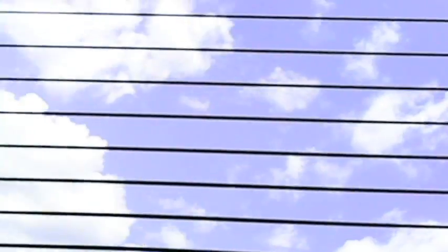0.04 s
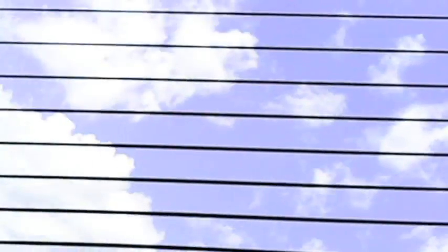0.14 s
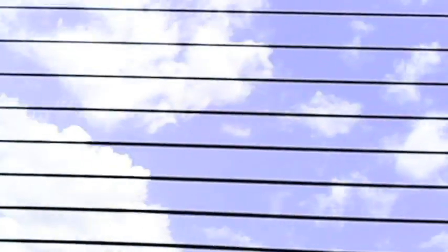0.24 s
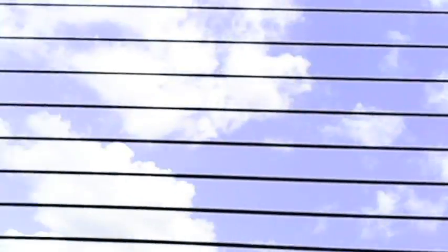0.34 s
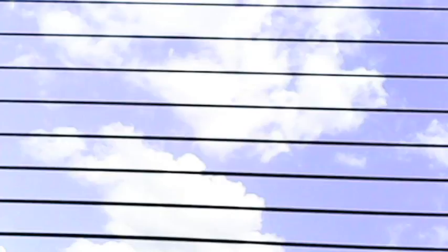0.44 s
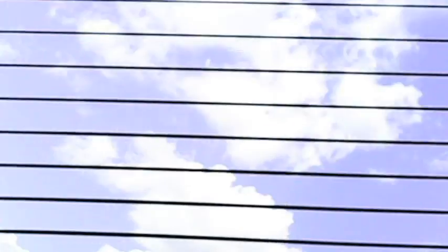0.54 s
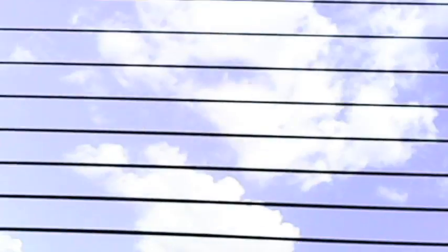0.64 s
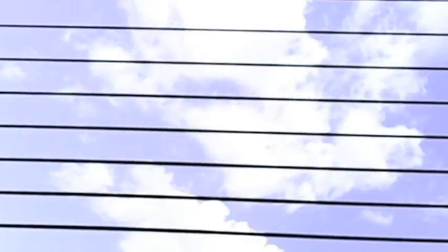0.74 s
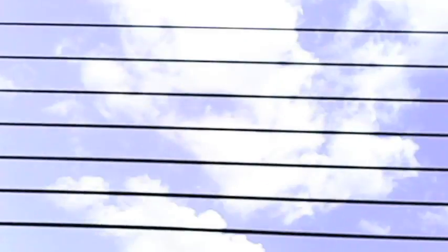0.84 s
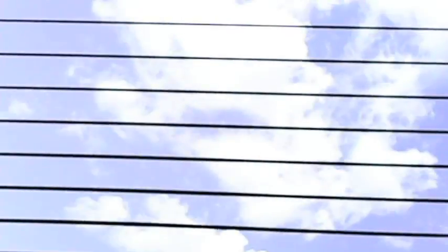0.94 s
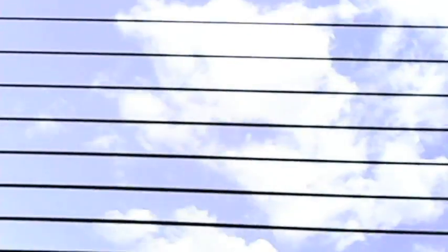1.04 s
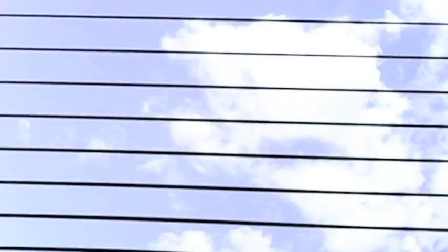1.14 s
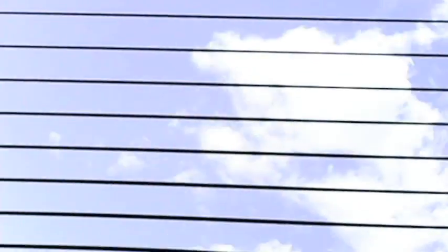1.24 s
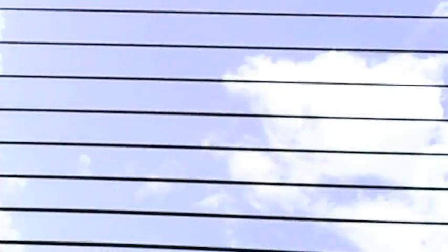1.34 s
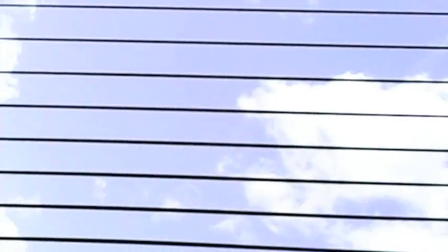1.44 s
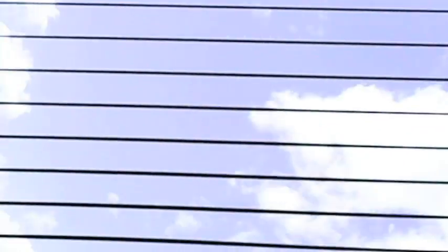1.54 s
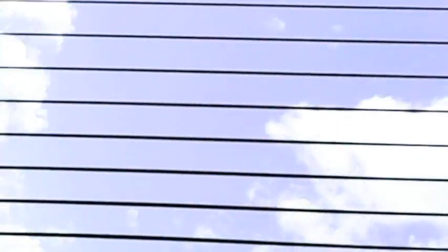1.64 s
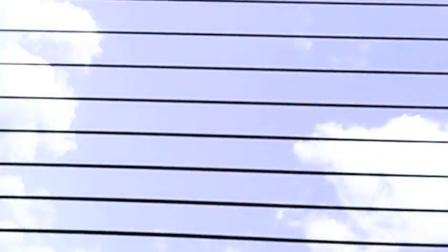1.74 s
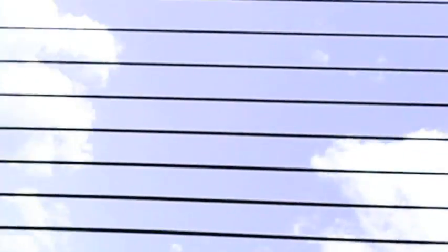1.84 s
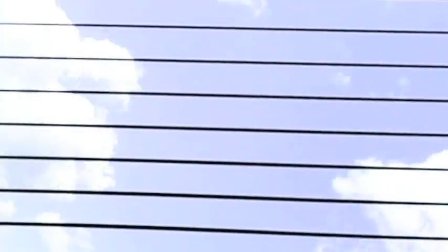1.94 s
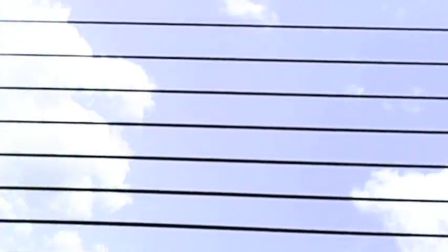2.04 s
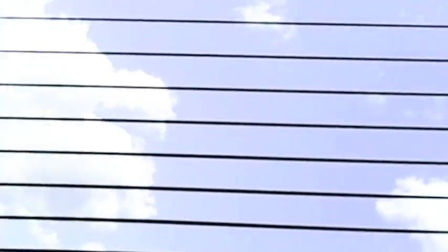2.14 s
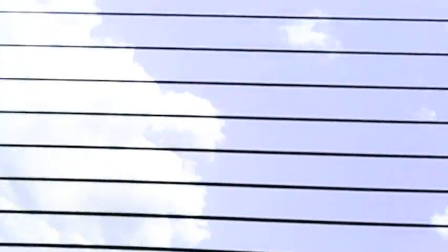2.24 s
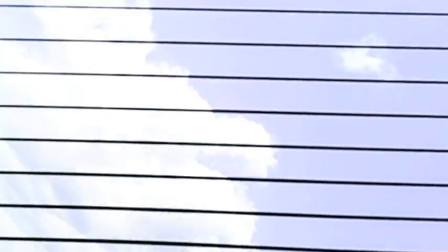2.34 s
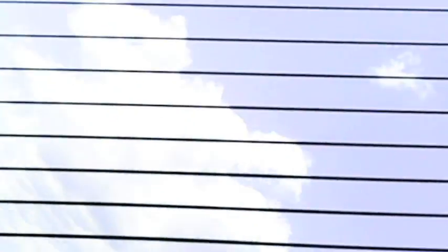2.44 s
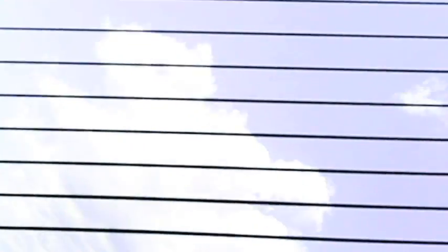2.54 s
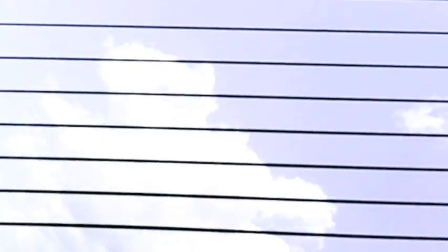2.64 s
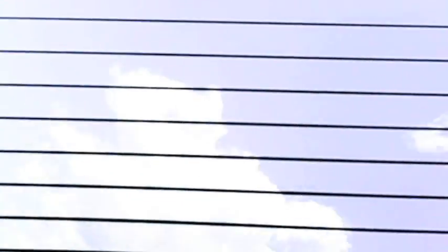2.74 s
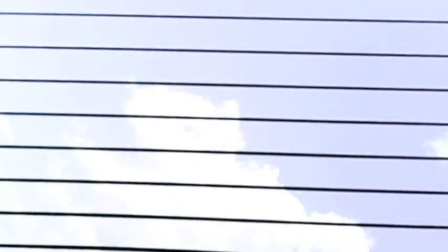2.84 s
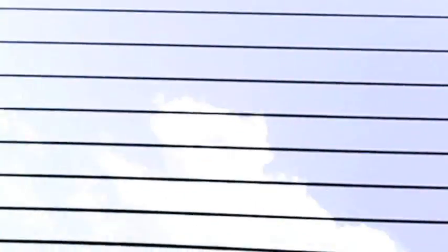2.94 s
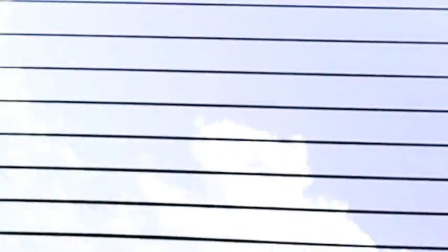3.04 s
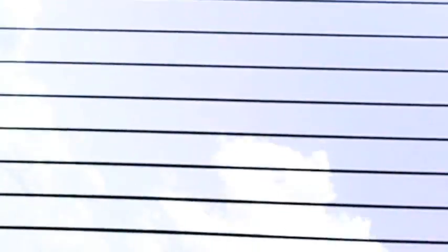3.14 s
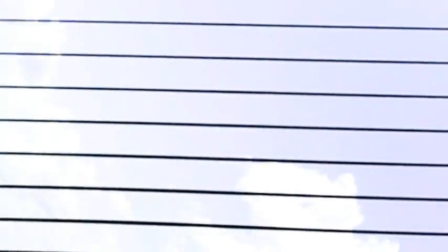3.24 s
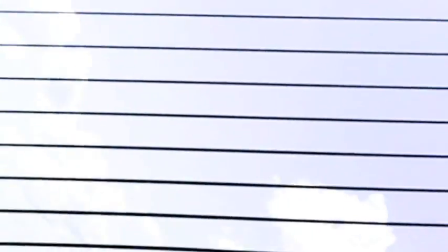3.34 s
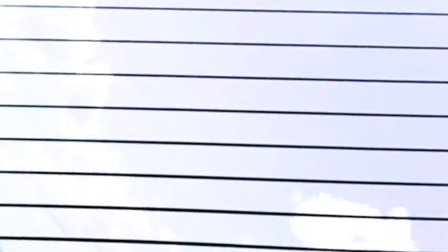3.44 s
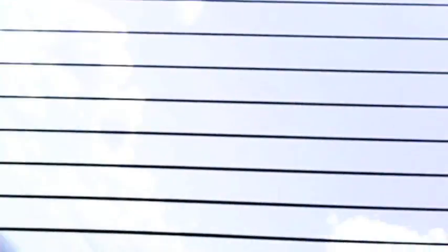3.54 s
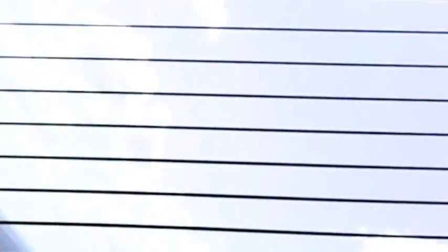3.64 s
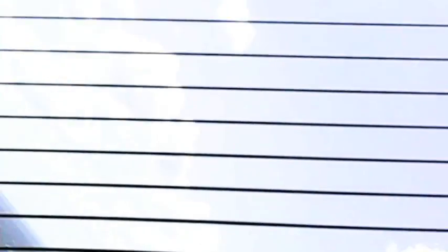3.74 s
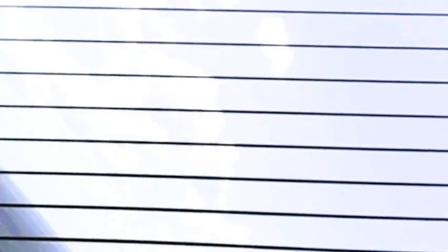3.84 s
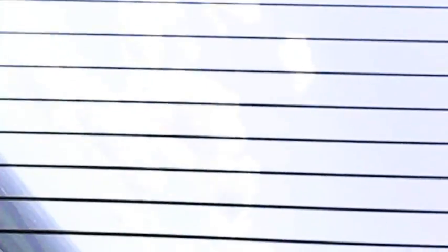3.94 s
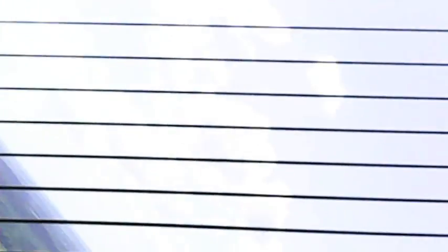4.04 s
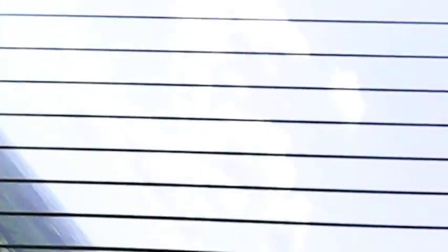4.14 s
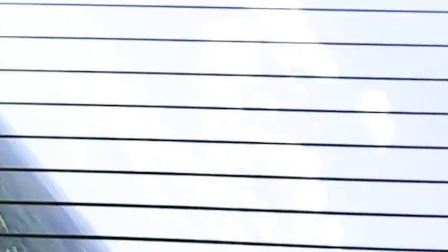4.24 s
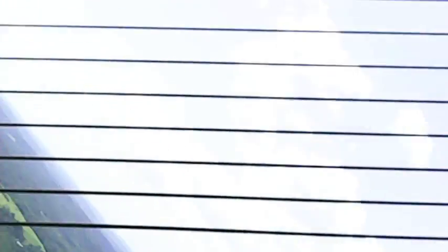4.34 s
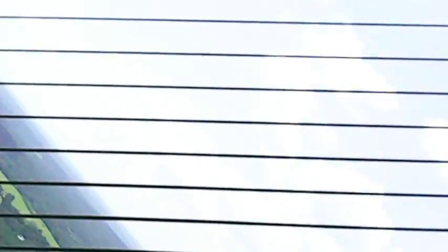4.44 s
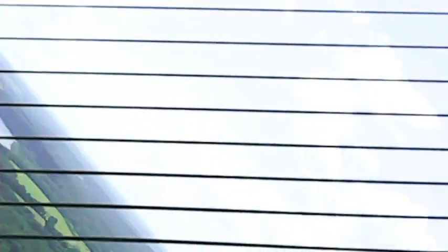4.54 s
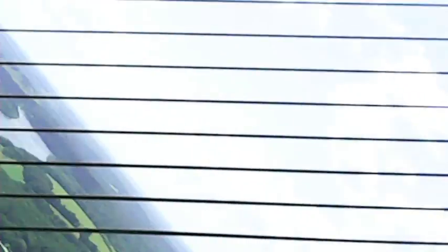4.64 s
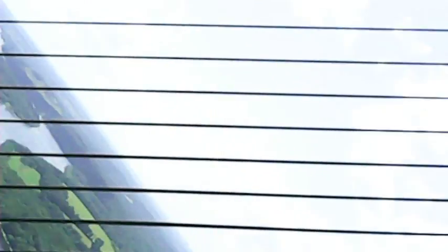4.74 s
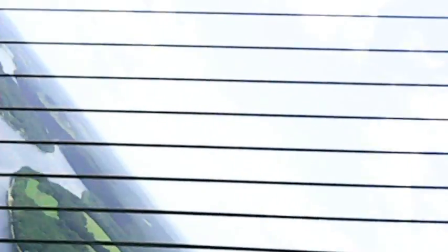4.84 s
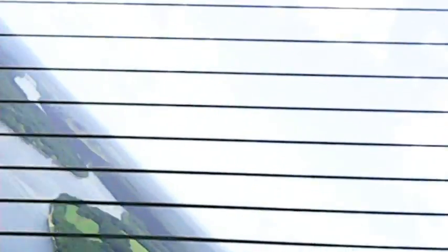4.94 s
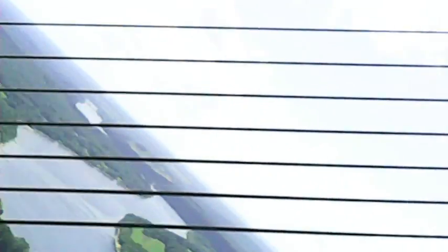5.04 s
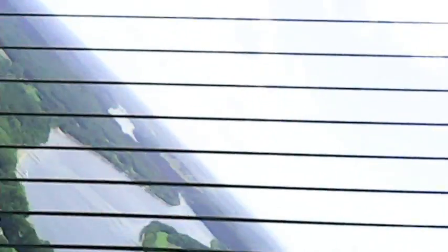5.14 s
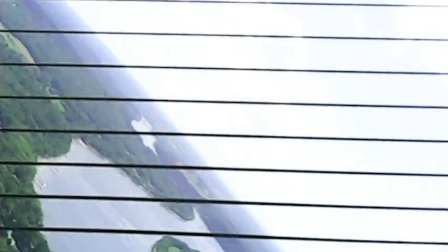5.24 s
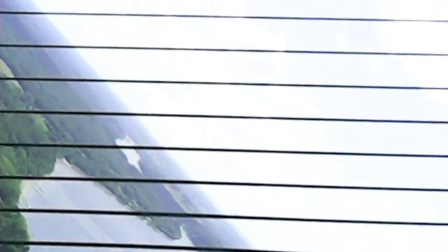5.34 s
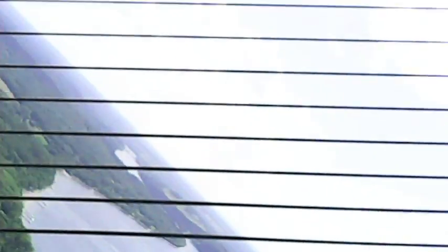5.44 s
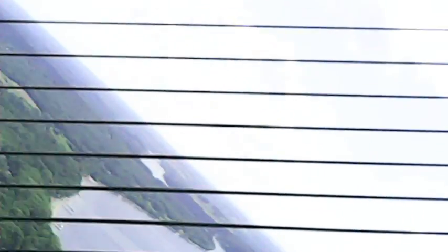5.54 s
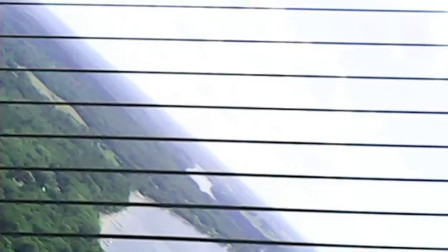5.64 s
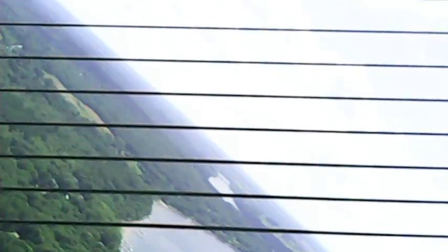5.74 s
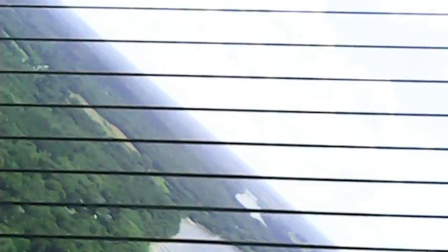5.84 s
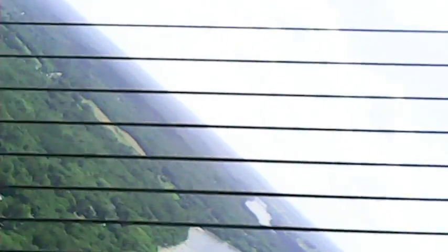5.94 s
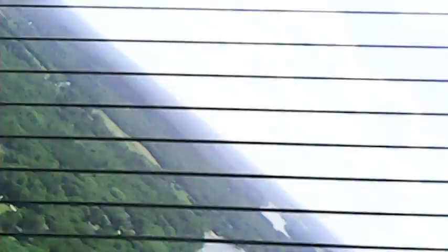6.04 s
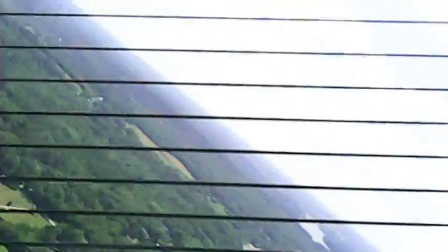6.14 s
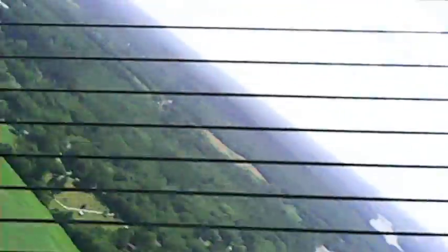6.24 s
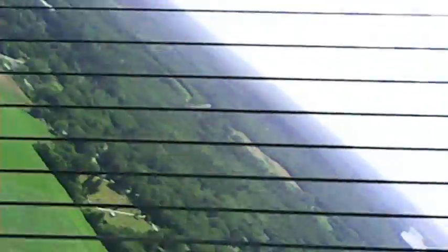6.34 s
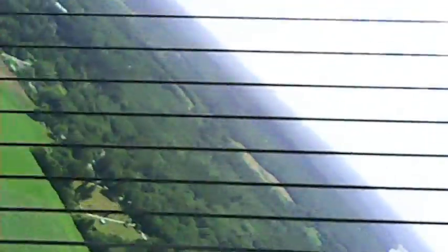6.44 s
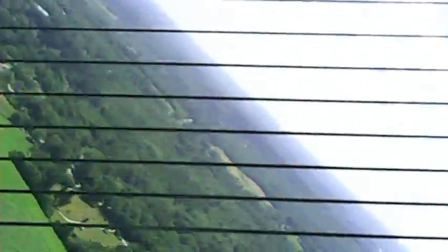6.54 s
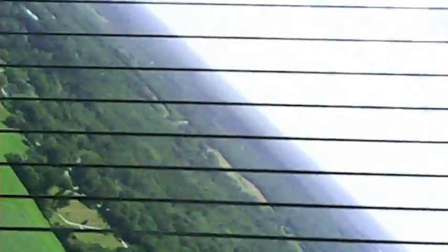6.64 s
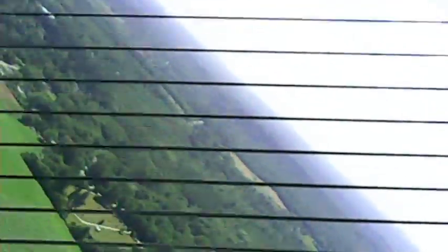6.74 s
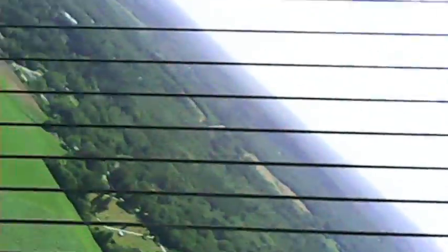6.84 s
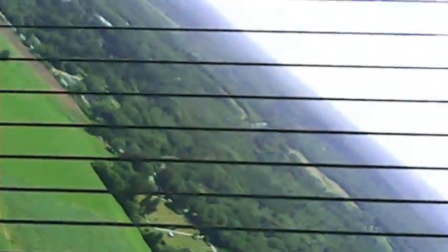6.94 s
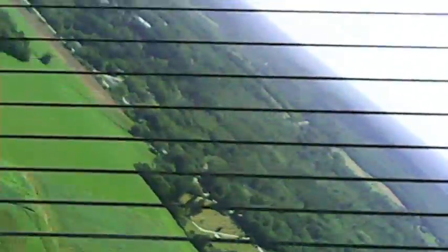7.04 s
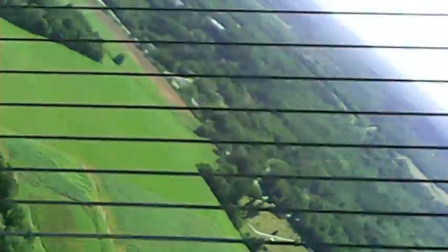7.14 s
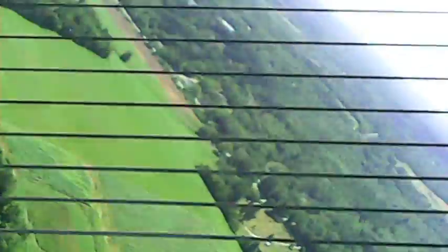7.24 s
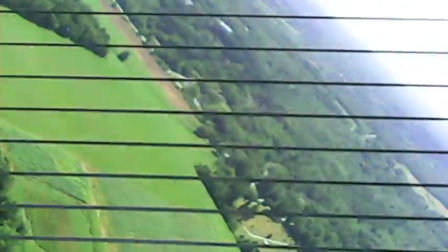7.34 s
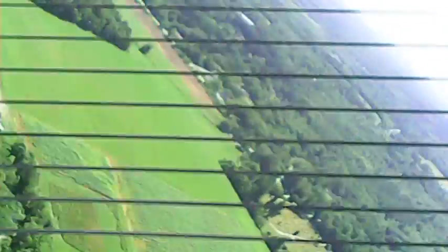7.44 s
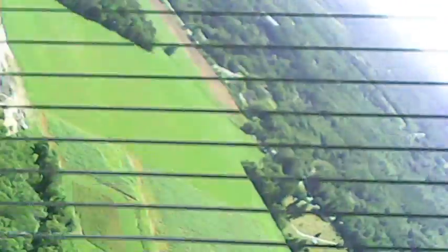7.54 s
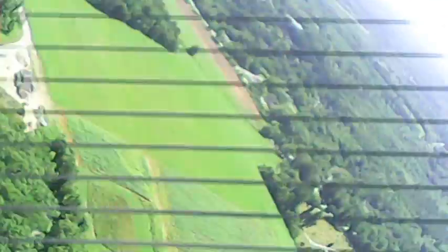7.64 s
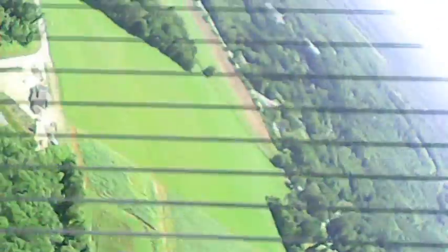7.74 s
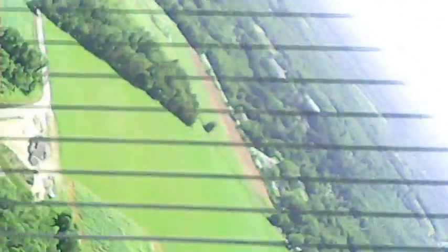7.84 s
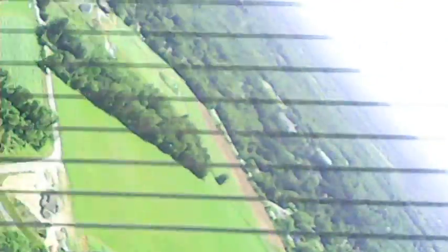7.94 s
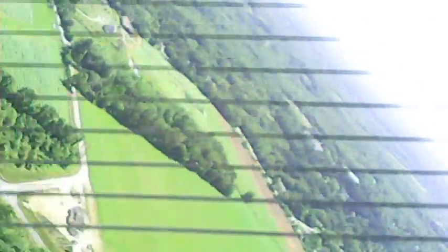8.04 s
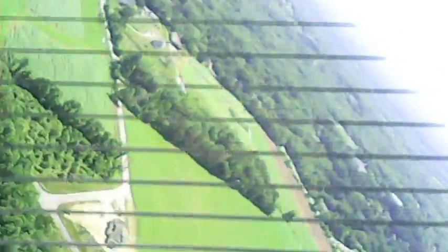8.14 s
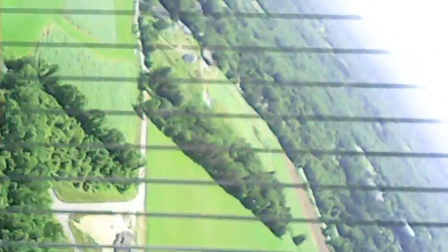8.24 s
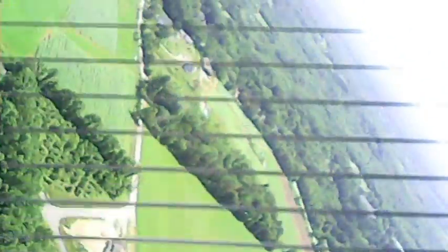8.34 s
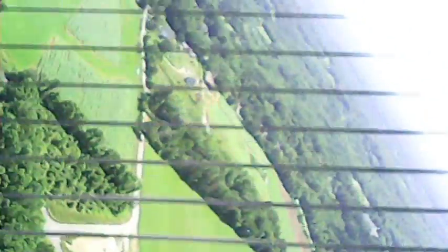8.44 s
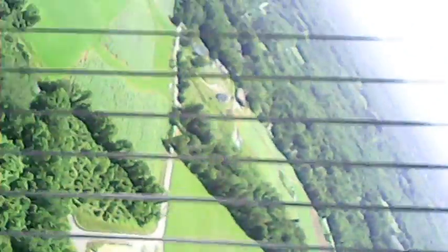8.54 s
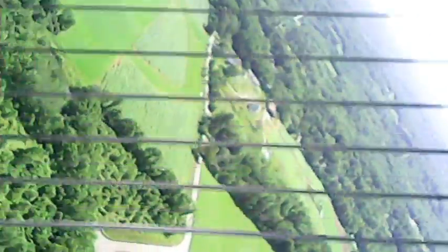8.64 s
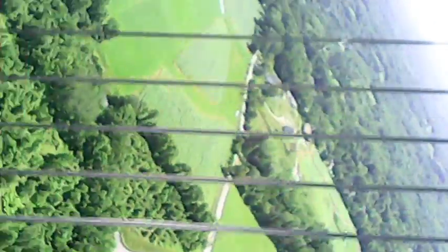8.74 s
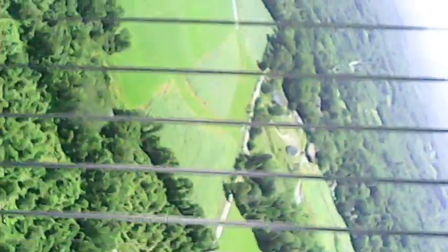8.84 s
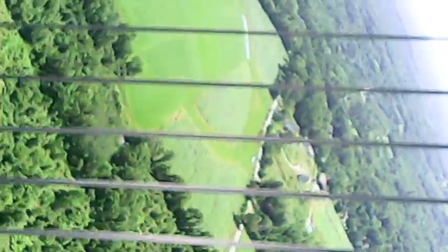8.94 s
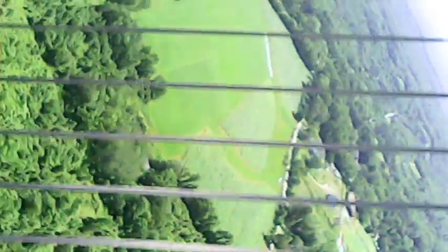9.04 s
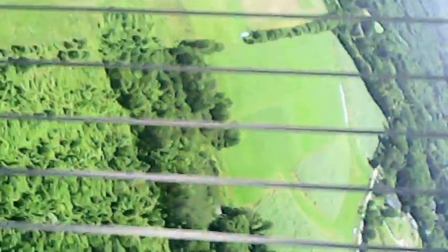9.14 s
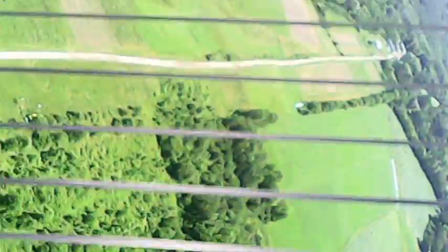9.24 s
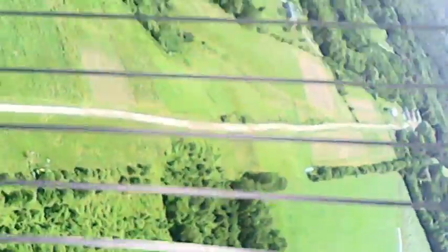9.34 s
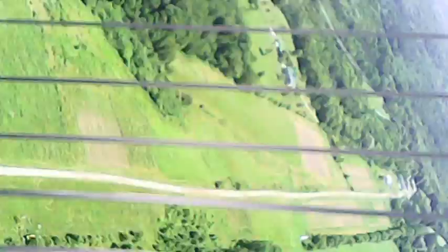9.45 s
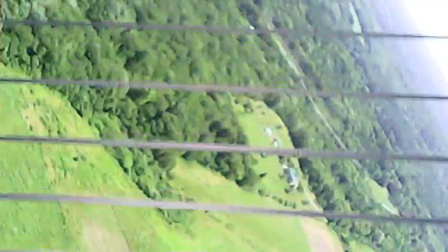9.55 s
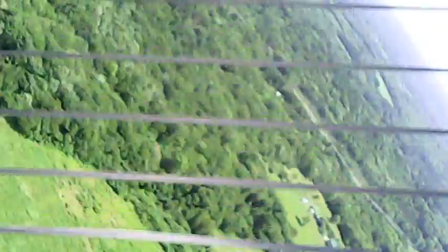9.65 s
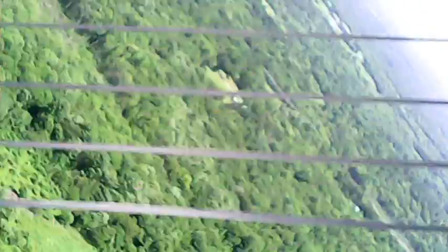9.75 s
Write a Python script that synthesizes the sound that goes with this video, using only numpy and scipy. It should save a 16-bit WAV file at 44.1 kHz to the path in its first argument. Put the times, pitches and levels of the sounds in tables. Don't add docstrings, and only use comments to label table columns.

```python
import sys
import numpy as np
from scipy import signal
from scipy.fft import rfft, irfft, next_fast_len
from scipy.io import wavfile

SR = 44100
rng = np.random.default_rng(int(sys.argv[2]) if len(sys.argv) > 2 else 0)


def ratio(d):
    e = np.asarray(d, float) / 20
    return 10 ** e


def int16_out(signal):
    q = np.round(np.clip(np.atleast_2d(signal).T, -1, 1) * 32767)
    wavfile.write(sys.argv[1], SR, q.astype(np.int16))


N = 431738

# start_s [s], level_db [dB]
ROAR = [(0.0, -28.5), (0.27, -28), (4.14, -27), (4.17, -24.5), (4.23, -27), (6.08, -25), (6.11, -27.5),
        (6.24, -24), (6.76, -25.5), (6.92, -24), (7.96, -23.5), (8.07, -21.5), (8.97, -29), (9.43, -27.5),
        (9.54, -30), (9.79, -28)]
# frequency_hz [Hz], level_db [dB per Hz]
PORT_SPECTRUM = [(20, 1), (60, 0), (200, 2.5), (450, 3), (620, -0.5), (800, -6), (2000, -12), (2900, -22),
                 (4150, -25.5), (4600, -31), (6100, -29.5), (7200, -37), (8500, -30.5), (10400, -46.5)]
# start_s [s], shaft_hz [turns per s]
POWERED_SHAFT = [(0.0, 137.06), (1.8, 137.18), (2.05, 137.25), (2.15, 137.45), (3.3, 137.75), (3.7, 137.99),
                 (4.7, 138.3), (4.95, 138.07), (5.3, 139.02), (5.8, 138.97), (5.97, 140.05), (6.15, 139.6),
                 (6.6, 140.22), (6.9, 140.85), (7.0, 140.56), (7.5, 142.03), (7.78, 142.07), (8.1, 142.73)]
TONE_ORDERS = (1, 2, 4, 6, 8, 42)
# order [multiple of shaft rate], leader [index in TONE_ORDERS], level_db [dB re leader]
COMPANIONS = [
    (3, 0, -5),
    (5, 1, -26),
    (7, 4, -4),
    (56, 5, -19),
    (70, 5, -29),
]
# [dB, fourth order from skewed inflow]
BLADE_LOAD = [(0.0, -21.5, -43.5), (1.0, -19, -35), (2.0, -19, -37), (2.5, -17, -30), (3.5, -17, -33.5),
              (4.0, -16, -37), (5.5, -16, -32.5), (6.0, -14, -25), (6.6, -15, -39.5), (6.82, -14.5, -21),
              (7.2, -15.5, -28), (7.38, -13.5, -19), (8.05, -14.5, -19), (8.4, -20.5, -20.5),
              (8.74, -23, -23.5), (9.0, -28.5, -46), (9.4, -25.5, -38), (9.62, -37, -38)]
# centre_s [s], rise_db [dB over usual imbalance], half_length_s [s]
SHUDDERS = [
    (0.0, 7, .2),
    (1.4, 1, .3),
    (2.45, 0.5, .2),
    (6.552, 9, 0.24),
    (7.606, 9.5, 0.089),
    (8.22, 10.5, .13),
    (8.8, 9, .15),
]
# [ms, suction peak]
OVERFLOWS = [
    (7.56235, .132, .33),
    (7.80857, .132, .36),
    (7.87902, .088, .62),
]

TIME_S = np.arange(N) / SR
BRAKE_S, DRIVE_CUT_S, PART_THROTTLE_S = 8.214, 8.27, 8.3
POSITIVE_RAIL, NEGATIVE_RAIL = 0.47, 0.7


def in_time(rows):
    start_s, *columns = np.transpose(rows)
    return [np.interp(TIME_S, start_s, column) for column in columns]


def drift(rate_hz):
    pole = np.exp(-16 * np.pi * rate_hz / SR)
    white = rng.standard_normal(N // 8 + 4002)
    slow = signal.lfilter([1], [1, -2 * pole, pole * pole], white)[4000:]
    return np.interp(np.arange(N) / 8, np.arange(len(slow)), slow / np.std(slow))


def swell(centre_s, db, half_s):
    return db * np.exp(-((TIME_S - centre_s) / half_s) ** 2)


def coasting(fade_s):
    since_s = np.maximum(TIME_S - BRAKE_S, 0)
    return 1 - np.exp(-(since_s / fade_s) ** 2)


def colour(x, points):
    size = next_fast_len(N)
    hz = np.maximum(np.arange(size // 2 + 1) * SR / size, 1)
    point_hz, point_db = np.transpose(points)
    gain = ratio(np.interp(np.log(hz), np.log(point_hz), point_db))
    return irfft(rfft(x, size) * gain, size)[:N]


def slipstream(turns):
    roar_db, = in_time(ROAR)
    swing_db = roar_db - np.median(roar_db)
    rumble_db = -0.057 * swing_db + 0.5 * coasting(0.3)
    body_db = -0.6 * swing_db - 6.5 * coasting(0.17)
    hiss_db = -0.18 * swing_db - 4.5 * coasting(0.5)
    rumble_db = rumble_db + 0.8 * drift(3.9)
    gust_db = -0.26 * drift(2.3)
    eddies_db = 1.5 * (0.29 * drift(35) + drift(220))
    wake = 1 + 0.05 * np.sin(4 * np.pi * turns)

    edges_hz = 17 * 2.0 ** np.arange(11)
    region_log = np.log2([60, 300, 900, 2200, 4300])
    white = rng.standard_normal((2, N))
    out = np.zeros(N)
    for k, (low, high) in enumerate(zip(edges_hz, edges_hz[1:])):
        octave = signal.butter(3, [low, high], "band", fs=SR, output="sos")
        band = signal.sosfilt(octave, white[k % 2])
        shares = [np.interp(np.log2(low), region_log, row) for row in np.eye(5)]
        tilt_db = shares[0] * rumble_db + shares[1] * body_db + shares[-1] * hiss_db
        small = np.clip(np.log2(low / 300) / 2, 0, 1)
        flicker_db = gust_db + small * eddies_db + 0.1 * drift(37)
        out += band * ratio(tilt_db + flicker_db) * wake ** small
    out = colour(out, PORT_SPECTRUM)
    middle = signal.butter(4, [900, 3000], "band", fs=SR, output="sos")
    roar = signal.sosfilt(middle, out)
    return ratio(roar_db) * out / np.std(roar)


def controller():
    on = np.clip((TIME_S - PART_THROTTLE_S) / 0.05, 0, 1)
    switching_hz, level_db = 7817, -63
    return np.sqrt(2) * ratio(level_db) * on * np.sin(2 * np.pi * switching_hz * TIME_S)


def shaft_rate():
    powered, = in_time(POWERED_SHAFT)
    since_s = TIME_S - BRAKE_S
    braking = POWERED_SHAFT[-1][1] - 94 * since_s
    windmill = 93.7 - 11.6 * since_s
    ease = 10
    return np.minimum(powered, ease * np.logaddexp(braking / ease, windmill / ease))


def tone_levels(rate):
    load_db, skew_db = in_time(BLADE_LOAD)
    stalled = coasting(0.45)
    fuselage_hz, width_hz = 545, 150
    ring6 = stalled * np.exp(-((6 * rate - fuselage_hz) / width_hz) ** 2)
    ring8 = stalled * np.exp(-((8 * rate - fuselage_hz) / width_hz) ** 2)
    imbalance_db = -35 - 15.5 * stalled + sum(swell(*row) for row in SHUDDERS)
    skew_swing_db = skew_db - np.median(skew_db)
    sixth_db = -41 + 0.33 * skew_swing_db * (1 - stalled) + 8.5 * ring6
    eighth_db = -46 + 17 * ring8
    whine_db = -40.5 + swell(7.94, -4.5, 0.42)
    return [imbalance_db, load_db, skew_db, sixth_db, eighth_db, whine_db]


def propeller(rate, levels_db):
    turns = np.cumsum(rate) / SR
    orders = list(zip(TONE_ORDERS, levels_db))
    orders += [(k, levels_db[leader] + relative_db) for k, leader, relative_db in COMPANIONS]
    mount_hz, mount_width_hz = 4450, 15.5
    orders += [(32, -52 - ((32 * rate - mount_hz) / mount_width_hz) ** 2)]
    driven = np.clip((DRIVE_CUT_S - TIME_S) / 0.06, 0, 1)
    out = np.zeros(N)
    for k, level_db in orders:
        aerial = k < 12
        shake_db = (1.0 if aerial else 0.4) * drift(16)
        if aerial and k != 2:
            weak = np.clip((-22 - level_db) / 10, 0, 1)
            shake_db = shake_db + 3 * drift(4.2) * weak
        phase = 2 * np.pi * (k * turns + rng.random())
        if aerial:
            phase = phase + 0.19 * drift(6.6)
        tone = np.sqrt(2) * ratio(level_db + shake_db) * np.sin(phase)
        out += tone if aerial else tone * driven
    return out


def scene():
    rate = shaft_rate()
    air = slipstream(np.cumsum(rate) / SR)
    tones = propeller(rate, tone_levels(rate))
    return (air + controller() + tones)[None]


def overload(x):
    x = x - 0.17 * (x ** 2 - np.mean(x ** 2))
    soft = POSITIVE_RAIL * np.tanh(x / POSITIVE_RAIL)
    hard = x / (1 + np.abs(x / NEGATIVE_RAIL) ** 6) ** (1 / 6)
    return np.where(x > 0, soft, hard)


def overflow(x):
    for centre_s, past_ms, dip_ms in OVERFLOWS:
        away_ms = np.abs(TIME_S - centre_s) * 1000
        pull = np.exp(-(away_ms / dip_ms) ** 3)
        flip = np.clip((past_ms / 2 - away_ms) * SR / 1000 + 0.5, 0, 1)
        x = x * (1 - pull) - NEGATIVE_RAIL * pull + 1.56 * flip
    return x


def roll_off(x):
    return signal.sosfilt(signal.butter(12, 11090, fs=SR, output="sos"), x)


def record(dry):
    x = overflow(overload(dry))
    top = signal.cheby2(7, 32, 11650, fs=SR, output="sos")
    x = signal.sosfiltfilt(top, x)
    return roll_off(np.clip(x, -1, 1))


dry = scene()
out = record(dry)
int16_out(out)
```